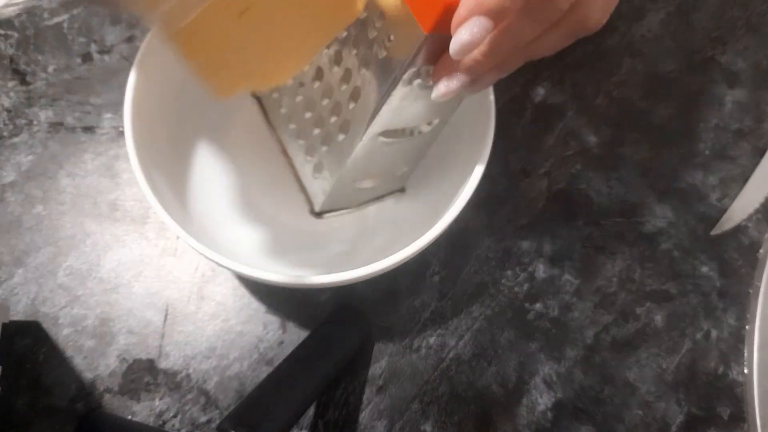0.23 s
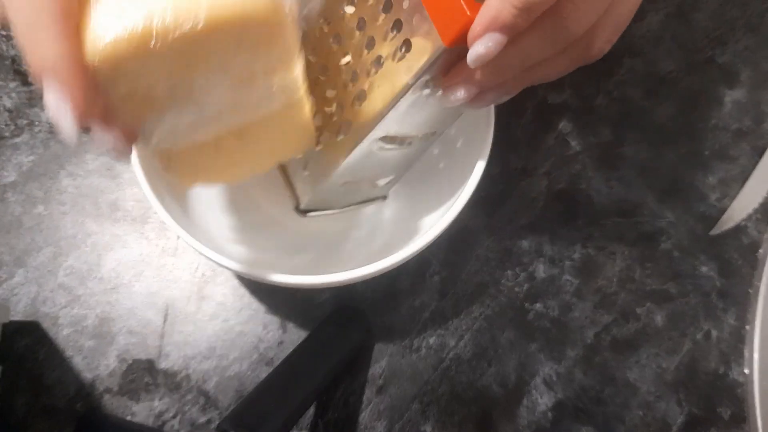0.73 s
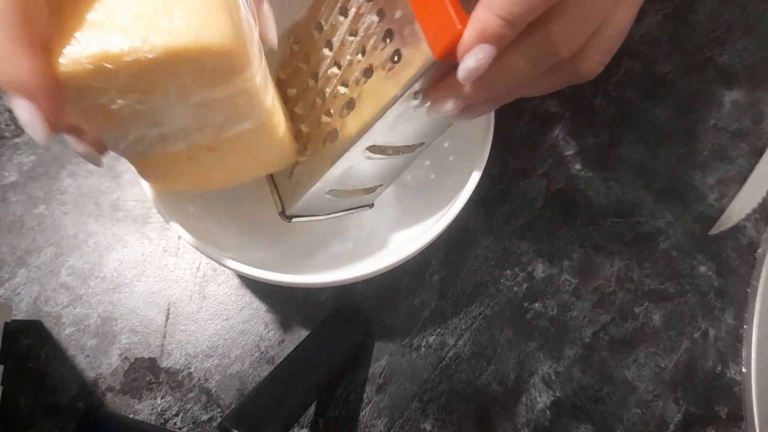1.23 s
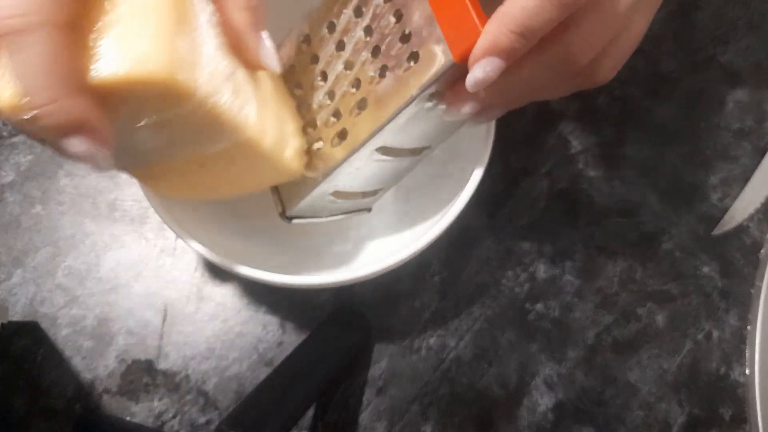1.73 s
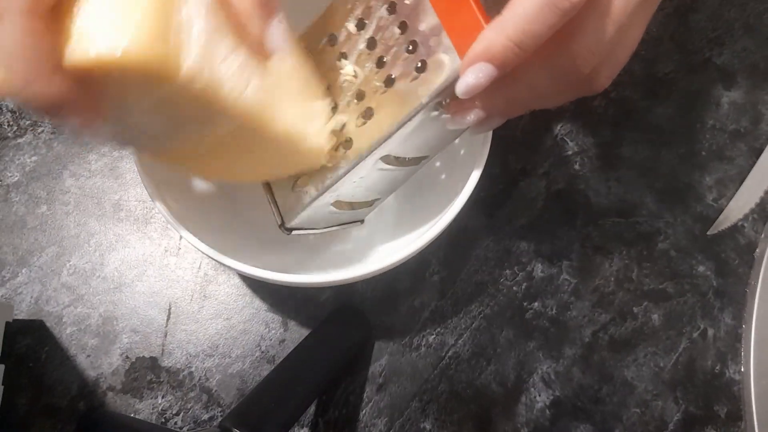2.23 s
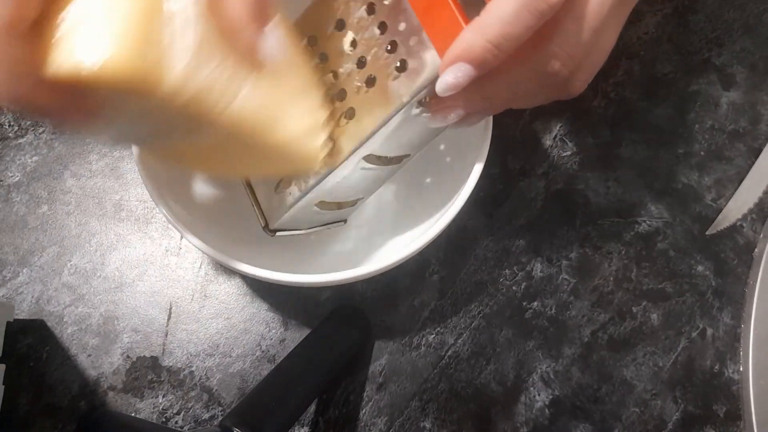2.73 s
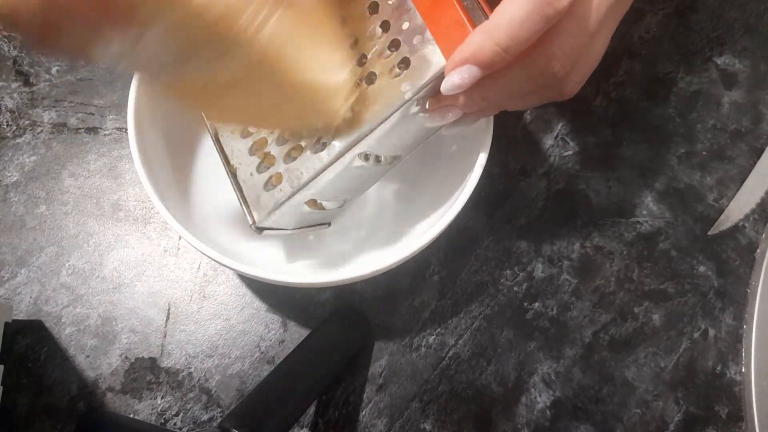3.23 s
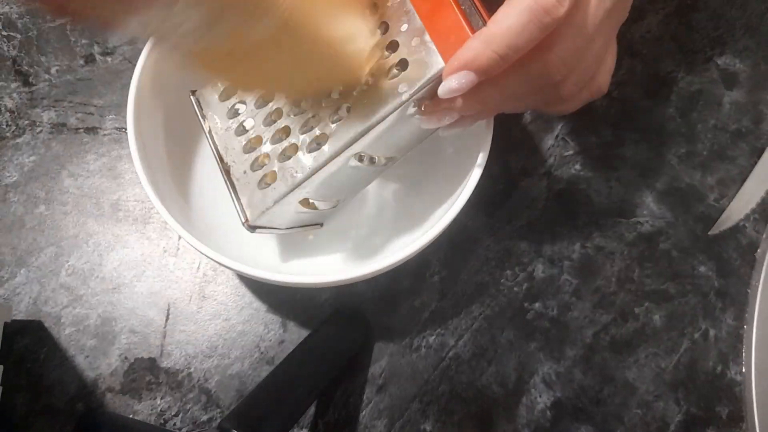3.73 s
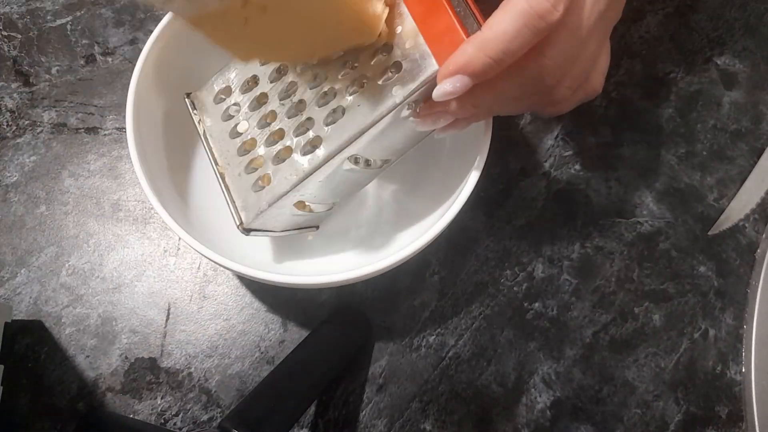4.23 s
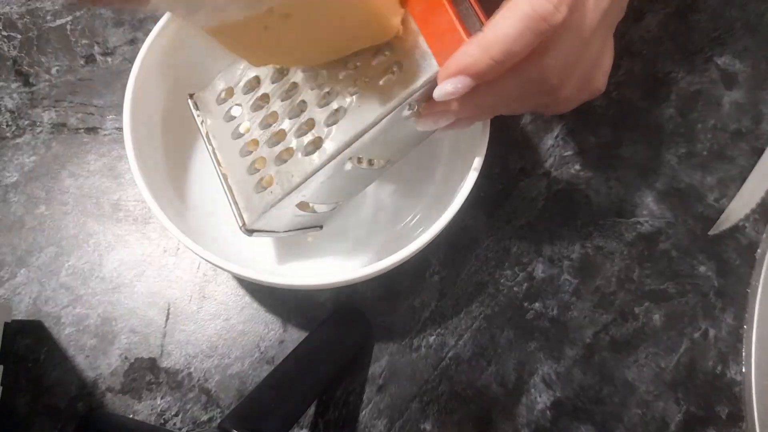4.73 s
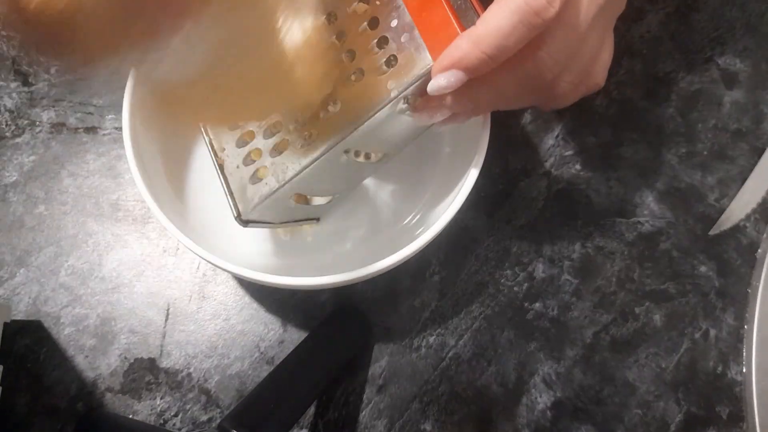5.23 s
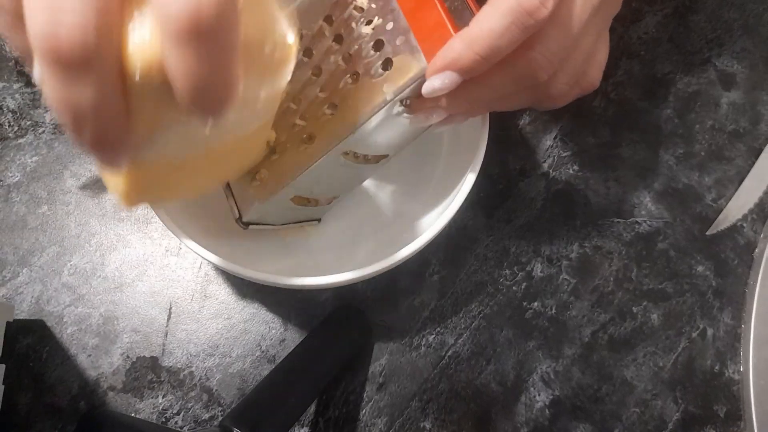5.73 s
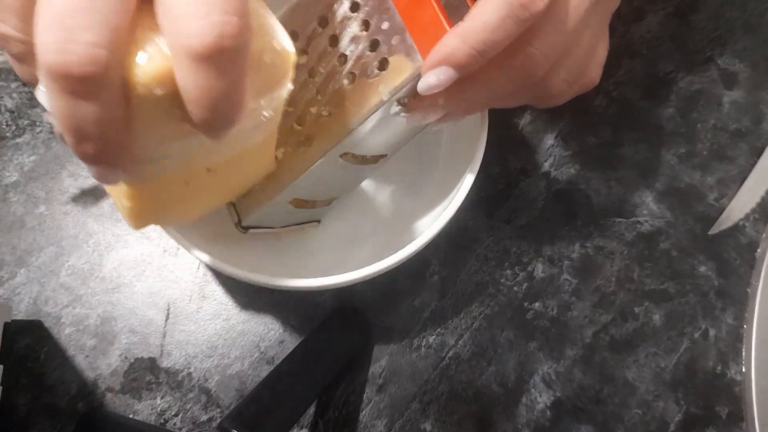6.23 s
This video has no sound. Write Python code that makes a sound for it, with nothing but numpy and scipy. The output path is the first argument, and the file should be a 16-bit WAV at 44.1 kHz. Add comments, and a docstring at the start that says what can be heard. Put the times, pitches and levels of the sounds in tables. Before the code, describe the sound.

Crackly cheese grating over metal teeth, push after push, shaking a china bowl on a counter, with small clunks and one hard final rattle.

```python
"""Grating hard cheese

A block of hard cheese is rubbed down a steel box grater standing in a china bowl on a kitchen counter.
Each stroke is a crackle of random noise puffs that rings the steel and shakes grater and bowl.
Now and then crumbs snap, the bowl judders, and the grater's foot knocks, hardest near the end: noise clicks
and decaying tones. Behind it, filtered noise is the room's air and wavering tones are an appliance's hum."""
import sys
import numpy as np
from scipy import signal
from scipy.io import wavfile

SR = 44100
rng = np.random.default_rng(int(sys.argv[2]) if len(sys.argv) > 2 else 0)


def generate_wav(signal):
    """Clip the signal to [-1, 1] and save it as 16-bit WAV at the path in sys.argv[1]."""
    frames = np.transpose(np.atleast_2d(signal))
    scaled = np.clip(frames, -1, 1) * 32767
    pcm = np.round(scaled).astype(np.int16)
    wavfile.write(sys.argv[1], SR, pcm)


N = 286018  # length of the scene [samples]

# Levels in the event and stroke tables are relative: the sources balance them further.
# Steady air of the room: (frequency [Hz], density [dB])
AIR_SPECTRUM = [(25, 3.5), (130, -9.5), (195, -12), (280, -6.5), (400, -17), (620, -10), (1000, -16.5),
                (1800, -22), (2500, -25.5), (6500, -41), (10000, -41), (14400, -25), (16000, -24)]
AIR_DB = -58.5
# Tones of the appliance's hum: (frequency [Hz], level [dB])
HUM_TONES = [(48.5, -63.5), (102, -61), (120, -84), (143, -57.5), (290, -67.5)]

# The bowl judders on the counter: (time [s], length [s], slip rate [1/s], level [dB])
JUDDERS = [(0.102, 0.069, 108, -39.5), (1.118, 0.047, 113, -40.5), (1.178, 0.045, 118, -43.5),
           (1.66, 0.051, 98, -43), (1.825, 0.062, 223, -43.5), (4.555, 0.0446, 130, -44.5),
           (5.738, 0.068, 120, -41), (6.355, 0.05, 109, -35)]

# The grater's foot knocks in the bowl:
# (time [s], tick [dB], counter thud [dB], bowl [dB], centre of the bowl's ring [Hz], steel clank [dB])
FOOT_KNOCKS = [(0.095, -38.5, -27, -29.5, 430, -43), (0.528, -53, -62, -42, 340, -63),
               (0.6025, -42.5, -47, -40.5, 372, -57), (0.852, -31.5, -32, -34.5, 318, -47.5),
               (1.046, -30.5, -39, -29.5, 382, -41), (1.2174, -62, -37, -45, 620, -53),
               (1.5486, -44, -48, -41, 670, -43), (1.8217, -70, -45, -42, 623, -61),
               (1.9848, -37, -51, -49.5, 350, -65), (2.1019, -42, -59, -49.5, 340, -48.5),
               (2.2451, -44.5, -45, -40, 337, -53), (2.7625, -49, -32, -42.5, 290, -51),
               (3.2659, -38.5, -40, -38.5, 340, -47), (3.6849, -37.5, -42, -46.5, 620, -46),
               (4.6501, -47, -38, -46.5, 625, -50), (4.9924, -53, -56, -37, 340, -44),
               (5.8239, -36.5, -43, -36.5, 345, -48.5), (6.2901, -53, -29, -29, 600, -44),
               (6.3255, -63, -28, -17, 960, -33), (6.3443, -55, -25, -41, 780, -47),
               (6.3615, -55, -24, -30, 950, -46), (6.4119, -39.5, -34, -34.5, 835, -43.5)]
# Ringing tones of the bowl with the grater in it: (frequency [Hz], level [dB], time to fall 60 dB [s])
BOWL_MODES = [(247, -22, 0.19), (329.7, 1, 0.18), (389.7, -7, 0.14), (447, -9, 0.37), (487.6, -12.5, 0.35),
              (593, 4, 0.15), (640.5, 2.5, 0.19), (787, 6.5, 0.036), (799, -5, 0.35), (867, -3.5, 0.25),
              (895, -10.5, 0.57)]
# Ringing tones of the grater's sheet steel: (frequency [Hz], level [dB], time to fall 60 dB [s])
STEEL_MODES = [(1144, 4, 0.049), (1246, 1.5, 0.11), (1330, 9, 0.043), (1560, -7, 0.22), (1756, 3, 0.095),
               (1870, 7, 0.061), (2157, 4, 0.078), (2334, -7, 0.42), (2626, -14, 0.31), (3095, 0.5, 0.11),
               (3190, -10, 0.21), (3840, -1, 0.14)]
# Ringing tones of the counter top: (frequency [Hz], level [dB], time to fall 60 dB [s])
COUNTER_MODES = [(83, -22, 0.23), (101.7, 2.5, 0.076), (131.6, 1.5, 0.17), (178, -3, 0.076)]
# Foot ticking on china: (frequency [Hz], density [dB])
TICK_SPECTRUM = [(500, -16), (2000, -7), (4000, 7), (6500, 9), (8500, 9), (12000, 5.5), (16000, -16)]
# Dull knock of the bowl: (frequency [Hz], density [dB])
KNOCK_SPECTRUM = [(60, -25.5), (200, -8.5), (330, 8.5), (430, 0), (520, 0), (620, 2.5), (830, -2),
                  (1060, -13), (1300, -8.5), (2500, -44), (6000, -62)]
# Rattle within the steel clank: (frequency [Hz], density [dB])
RATTLE_SPECTRUM = [(600, -11.5), (1250, -6), (1750, 4), (2100, -6), (2600, -4.5), (3300, -11.5),
                   (6000, -23)]
EDGE_PING_HZ = 3780
# The clank centres on CLANK_HZ when the bowl level is CLANK_DB; a heavier blow clanks lower.
CLANK_HZ, CLANK_DB, CLANK_DB_PER_OCTAVE = 1650, -41.5, 29

# A tooth snags and tears free: (time [s], snap [dB], steel ping [dB])
CATCHES = [(0.3666, -42, -64), (0.5175, -44, -66), (1.3625, -39.5, -47.5), (1.4254, -54, -49.5),
           (1.5664, -45, -49), (1.625, -33.5, -64), (1.702, -40, -54), (1.9195, -42, -46.5),
           (1.9378, -47, -46.5), (2.278, -40, -66), (2.3087, -45, -53), (2.835, -38, -46),
           (3.2093, -46, -47.5), (3.5197, -46, -47), (3.6529, -48, -57), (4.0918, -57, -47.5),
           (4.1644, -64, -53), (4.2344, -62, -55), (4.9427, -43, -49), (5.0874, -42.5, -56),
           (5.172, -45, -53), (5.4632, -39, -65)]
SNAG_HZ, SNAG_OCTAVES = 1500, 0.1  # middle pitch of the pings, and their random spread

# The block is pushed down over the teeth:
# (start [s], length [s], pressure [dB], hiss of the sliding face [dB])
PUSHES = [(-0.05, 0.39, -1.5, -57.5), (0.58, 0.38, -10.5, -63), (1.04, 0.32, 0.5, -58.5),
          (1.54, 0.43, 1, -53.5), (2.15, 0.26, 1.5, -56), (2.68, 0.32, 2, -55), (3.23, 0.32, 0.5, -56),
          (3.77, 0.29, -3, -59.5), (4.44, 0.31, -1, -60.5), (4.905, 0.37, 1.5, -57),
          (5.75, 0.16, -1.5, -57.5), (6.25, 0.34, 2, -57.5)]
# The block is drawn lightly back up:
# (start [s], length [s], pressure [dB], hiss of the sliding face [dB])
RETURNS = [(0.30, 0.26, -14, -55.5), (0.85, 0.094, -3.5, -58), (1.28, 0.26, -4.5, -59),
           (1.90, 0.21, -6, -65), (2.36, 0.13, -6.5, -59), (2.89, 0.14, -7, -83), (3.10, 0.098, -29, -72),
           (4.05, 0.19, -9, -86), (4.33, 0.15, -4.5, -65), (5.37, 0.24, -23, -60)]
# Share of a move at which it presses hardest; how softly it swells and fades
PUSH_PEAK, PUSH_ROUNDNESS = 0.22, 1.49
RETURN_PEAK, RETURN_ROUNDNESS = 0.31, 0.79
REST_DB, REST_HISS_DB = -11, -65.5  # between strokes the block still brushes the steel
RASP_DB = -56.5  # gain of the rasp at a pressure of 0 dB
SHUDDER_DB, SHUDDER_LAW = -44.5, 0.81  # shudder gain at a pressure of 0 dB, and its dB per dB of pressure
UNEVEN_DB, UNEVEN_HZ = 1.5, 44.82  # the grip varies as rows of teeth pass
# Teeth rasping through cheese: (frequency [Hz], density [dB])
RASP_SPECTRUM = [(150, -19), (500, 9), (1000, -3.5), (1400, -1.5), (2000, -0.5), (3000, -8.5), (5000, -8),
                 (7000, -18), (10000, -19), (16000, -34.5)]
# Sliding face of the block: (frequency [Hz], density [dB])
HISS_SPECTRUM = [(1000, -14.5), (3000, -5), (5500, -3), (7000, -1.5), (10000, -1), (12500, 1),
                 (16000, -3.5)]
# Shaking of grater and bowl: (frequency [Hz], density [dB])
SHUDDER_SPECTRUM = [(30, -50), (70, -1.5), (115, 5.5), (150, 1), (190, -8), (260, -1.5), (330, -6.5),
                    (480, -19), (750, -20), (1100, -30.5), (4000, -58.5)]
# Patches of teeth, each with a ping of its own: (frequency [Hz])
TEETH_PINGS = [1400, 1810, 2640, 3340, 4540, 5750, 7320, 8750]

# Stereo width, bass near mono and treble wide: (frequency [Hz], gain of the side signal [dB])
WIDTH = [(60, -19), (150, -12.5), (300, -6), (700, -4), (2000, -2), (16000, 1.5)]
# Balance of the two channels: (frequency [Hz], left minus right [dB])
LEAN = [(100, -2), (350, 0.5), (1200, 0.3), (2500, -0.5), (5000, -0.5), (9000, -2.5), (14000, -0.5)]
LEFT_LAG = 5  # the left channel arrives later [samples]
# The microphone's treble steps down: (frequency [Hz], gain [dB])
MICROPHONE = [(6700, -0.5), (7200, -1.5), (7700, -4.5), (8200, -6.5)]
EDGE_HZ = 15850  # upper band limit


def amp(db):
    """Turns decibels into a gain."""
    return 10 ** (np.asarray(db) / 20)


def unit(x, size=None):
    """Scales to an average strength (rms) of 1, judged over the first size samples."""
    return x / np.sqrt(np.mean(x[..., :size] ** 2) + 1e-20)


def add(mix, s, sound):
    """Mixes a sound in at time s."""
    part = mix[:, max(round(s * SR), 0):][:, :sound.shape[-1]]
    part += sound[..., :part.shape[1]]


def through(x, response):
    """Passes each channel through a response (convolution) and keeps the length."""
    return signal.fftconvolve(x, np.atleast_2d(response), axes=1)[:, :x.shape[1]]


def colour(points, size=4096):
    """Builds a filter with the given spectrum that never sounds ahead of its input."""
    hz, db = np.transpose(points)
    f = abs(np.fft.fftfreq(size, 1 / SR))
    log_gain = np.log(amp(np.interp(np.log(f + 1), np.log(hz), db)))
    # the minimum phase belonging to this gain
    spectrum = np.exp(np.conj(signal.hilbert(log_gain)))
    return np.fft.ifft(spectrum).real[:size // 2]


def ring(modes, t, weights=1):
    """Dying tones as mid (shared) and side (left-right difference); random signs stand for the spot touched."""
    hz, db, t60 = np.transpose(modes)
    signs = rng.choice([-1, 1], (2, len(hz)))
    tones = amp(-60 * t / t60[:, None]) * np.exp(2j * np.pi * hz[:, None] * t)
    mid, side = (signs * weights * amp(db)) @ tones
    soft_start = 1 - np.exp(-t / .0003)
    return np.array([mid.imag, side.real * soft_start])


def around(modes, centre_hz, octaves):
    """A contact favours the tones near one pitch."""
    distance = np.log2(np.transpose(modes)[0] / centre_hz)
    return np.exp(-.5 * (distance / octaves) ** 2)


def wander(hz):
    """Random drift of rms 1, with hz new targets per second."""
    knots = rng.standard_normal(4000)
    return unit(np.interp(np.arange(N) / SR * hz, np.arange(len(knots)), knots))


def burst(t, decay_s, room_db, room_t60, direct_db):
    """One direct click in the middle, a short scatter of noise, then a fading tail."""
    fade = np.exp(-t / decay_s) + amp(room_db - 60 * t / room_t60)
    sound = rng.standard_normal((2, len(t))) * fade
    sound[0, 0] = amp(direct_db) * np.sqrt(decay_s * SR / 2)
    return sound


def kitchen():
    """Steady air is filtered noise; the appliance's hum is tones wavering in phase and strength."""
    t = np.arange(N) / SR
    hum = 0
    for hz, db in HUM_TONES:
        tone = np.sin(2 * np.pi * hz * t + .5 * wander(7.9))
        hum = hum + amp(db) * unit(tone * (1 + 0.74 * wander(12)))
    air = unit(through(rng.standard_normal((2, N)), colour(AIR_SPECTRUM)))
    return amp(AIR_DB) * air + hum


def judder(length_s, slip_hz, db, sag=0.022, slope_db=11):
    """A brief run of stick and slip, a buzz of four harmonics, that slows as the push eases."""
    t = np.arange(round(length_s * SR)) / SR
    turns = np.cumsum(slip_hz * (1 + sag * (1 - 2 * t / length_s))) / SR
    slips = 0
    for k in range(4):
        phase = rng.random((2, 1))
        slips = slips + amp(-slope_db * k) * np.sin(2 * np.pi * ((k + 1) * turns + phase))
    return amp(db) * unit(slips * signal.windows.tukey(len(t), .35))


def blow(tick_db, thud_db, bowl_db, bowl_hz, clank_db, thud_rise_s=0.0027, chatter=0.2):
    """The steel foot ticks on the china; grater, bowl and counter ring."""
    t = np.arange(SR // 2) / SR
    clank_hz = CLANK_HZ * 2 ** ((CLANK_DB - bowl_db) / CLANK_DB_PER_OCTAVE)
    tail_db = chatter * bowl_db  # a harder blow leaves the grater chattering in the bowl

    tick_click = burst(t, decay_s=.0045, room_db=-18, room_t60=.26, direct_db=-7)
    tick = unit(through(tick_click, colour(TICK_SPECTRUM)), size=200)
    edge = amp(-11) * unit(ring([(EDGE_PING_HZ, 0, .045)], t), size=200)

    knock_click = burst(t, decay_s=.006, room_db=tail_db, room_t60=.36, direct_db=2)
    knock = unit(through(knock_click, colour(KNOCK_SPECTRUM)), size=900)
    bowl_ring = unit(ring(BOWL_MODES, t, around(BOWL_MODES, bowl_hz, octaves=0.72)), size=900)
    bowl = unit(bowl_ring + amp(0.5) * knock, size=900)

    rattle_click = burst(t, decay_s=0.013, room_db=tail_db, room_t60=0.18, direct_db=4.5)
    rattle = unit(through(rattle_click, colour(RATTLE_SPECTRUM)), size=900)
    steel_ring = unit(ring(STEEL_MODES, t, around(STEEL_MODES, clank_hz, octaves=0.69)), size=900)
    clank = unit(steel_ring + rattle, size=900)

    thud = unit(ring(COUNTER_MODES, t) * (1 - np.exp(-t / thud_rise_s)), size=1500)
    metal = amp(tick_db - 6) * (tick + edge) + amp(clank_db - 4) * clank
    return metal + amp(thud_db - 8.0) * thud + amp(bowl_db - 4.5) * bowl


def catch(snap_db, ping_db):
    """A crumb snaps off a tooth and the sheet pings briefly, each time near a pitch of its own."""
    t = np.arange(SR // 4) / SR
    click = burst(t, decay_s=.0045, room_db=-20, room_t60=.2, direct_db=-12)
    snap = unit(through(click, colour(HISS_SPECTRUM)), size=200)
    ping_hz = SNAG_HZ * 2 ** (SNAG_OCTAVES * rng.standard_normal())
    sheet = unit(ring(STEEL_MODES, t, around(STEEL_MODES, ping_hz, octaves=0.17)), size=500)
    ping = unit(through(click, colour(RASP_SPECTRUM)), size=500) + amp(-5.5) * sheet
    return amp(snap_db - 6) * snap + amp(ping_db - 5.5) * ping


def swing(start, length, peak, roundness):
    """One move of the hand: an arch that presses in quickly and lets go more slowly."""
    top = start + np.clip(peak, .05, .95) * length
    done = np.interp(np.arange(N) / SR, [start, top, start + length], [0, .5, 1])
    return abs(np.sin(np.pi * done)) ** roundness


def hand():
    """Pushes and returns set the gains of rasp, hiss and shudder."""
    pressure, hiss = amp(REST_DB), amp(REST_HISS_DB)
    strokes = (PUSHES, PUSH_PEAK, PUSH_ROUNDNESS), (RETURNS, RETURN_PEAK, RETURN_ROUNDNESS)
    for table, peak, roundness in strokes:
        for start, length, pressure_db, hiss_db in table:
            move = swing(start, length, peak, roundness)
            # overlapping moves add as powers
            pressure = np.hypot(pressure, amp(pressure_db) * move)
            hiss = np.hypot(hiss, amp(hiss_db) * move)
    grip = amp(UNEVEN_DB * wander(UNEVEN_HZ))
    shudder = amp(SHUDDER_DB) * (pressure * grip) ** SHUDDER_LAW
    return amp(RASP_DB) * pressure * grip, hiss * grip, shudder


def crackle(per_s, spread_db, clump_db, clump_hz):
    """Tiny fractures of uneven size at random moments, swelling in clumps as rows of teeth bite."""
    happens = rng.random(N) < per_s / SR
    sizes = amp(spread_db * np.minimum(rng.exponential(1, N), 4)) * happens
    clicks = sizes * amp(clump_db * wander(clump_hz))
    t = np.arange(SR // 4) / SR
    # each fracture is its own puff of noise with a faint room tail; doubled decibels, as these are powers
    puff = np.exp(-t / .0007) + amp(-33 - 120 * t / .28)
    power = through(clicks[None] ** 2, puff)
    return unit(np.sqrt(abs(power)) * rng.standard_normal((2, N)))


def teeth_pings(t):
    """Each patch of teeth is plucked at its own random moments, so the rasp keeps changing colour."""
    pings = 0
    for hz in TEETH_PINGS:
        happens = rng.random(N) < 60 / SR  # about 60 plucks a second
        plucks = amp(4.5 * np.minimum(rng.exponential(1, N), 3)) * happens
        pings = pings + through(plucks[None], ring([(hz, 0, .011)], t))
    return unit(pings)


def grating():
    """Teeth cut the cheese; the crackle rings the steel, and the drag shakes grater and bowl."""
    rasp, hiss, shudder = hand()
    t = np.arange(SR // 3) / SR
    cuts = crackle(per_s=800, spread_db=4.1, clump_db=3.1, clump_hz=60)
    slide = crackle(per_s=3500, spread_db=3.4, clump_db=2, clump_hz=60)
    drag = crackle(per_s=1400, spread_db=5.0, clump_db=0.0, clump_hz=39.6)

    tearing = unit(through(cuts, colour(RASP_SPECTRUM))) + amp(-5.5) * teeth_pings(t)
    steel = unit(through(cuts, ring(STEEL_MODES, t)))
    teeth = amp(-1.5) * tearing + amp(-7) * steel
    # air rings in the hollow of the grater
    hollow = amp(-.5) * unit(through(drag, ring([(630, 0, .14)], t)))
    sliding = amp(3.5) * unit(through(slide, colour(HISS_SPECTRUM)))
    shaking = unit(through(drag, colour(SHUDDER_SPECTRUM)))
    bowl = unit(through(drag, ring(BOWL_MODES, t)))
    body = amp(-3) * shaking + amp(-17.5) * bowl
    return rasp * (teeth + hollow) + hiss * sliding + shudder * body


def scene():
    """Mixes all sources as mid and side, then spreads them to left and right."""
    mix = kitchen() + grating()
    for table, source in (JUDDERS, judder), (FOOT_KNOCKS, blow), (CATCHES, catch):
        for s, *row in table:
            add(mix, s, source(*row))
    mid, side = mix[:1], through(mix[1:], colour(WIDTH))
    left = through(mid + side, colour([(hz, db / 2) for hz, db in LEAN]))
    right = through(mid - side, colour([(hz, -db / 2) for hz, db in LEAN]))
    late_left = np.pad(left[0], (LEFT_LAG, 0))[:N]
    return np.vstack([late_left, right])


def record(dry):
    """Applies the microphone's colour, then removes the deepest bass and the highest treble."""
    coloured = through(dry, colour(MICROPHONE))
    low_cut = signal.butter(6, 40, "high", fs=SR, output="sos")
    high_cut = signal.firwin(511, EDGE_HZ, window=("kaiser", 9), fs=SR)
    return signal.oaconvolve(signal.sosfilt(low_cut, coloured), high_cut[None], "same")


dry = scene()
out = record(dry)
generate_wav(out)
```